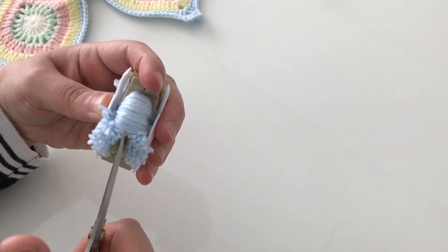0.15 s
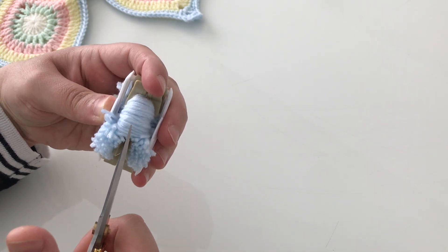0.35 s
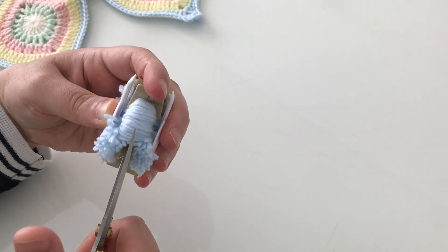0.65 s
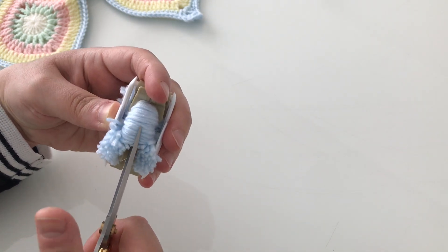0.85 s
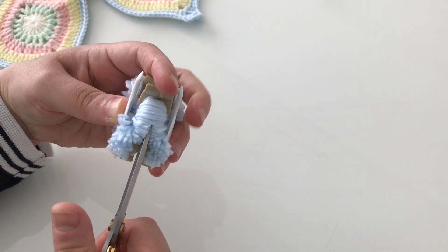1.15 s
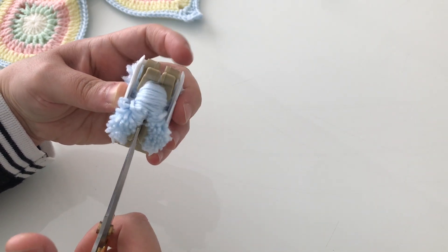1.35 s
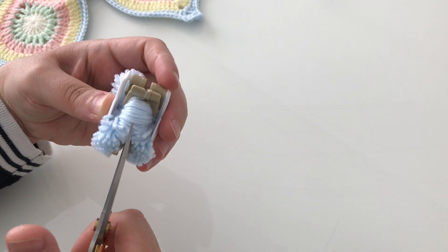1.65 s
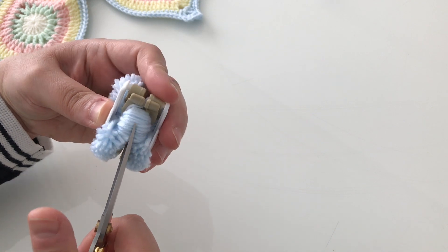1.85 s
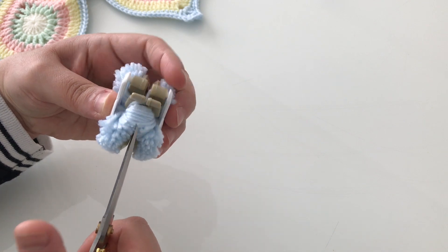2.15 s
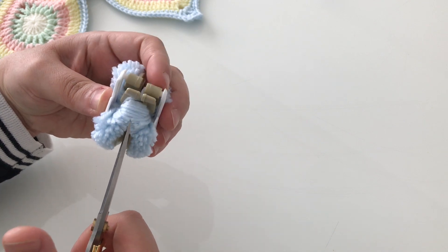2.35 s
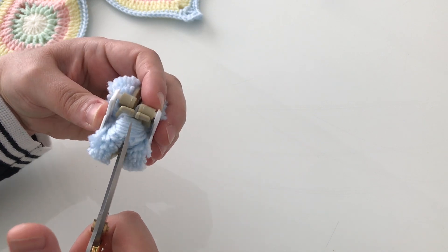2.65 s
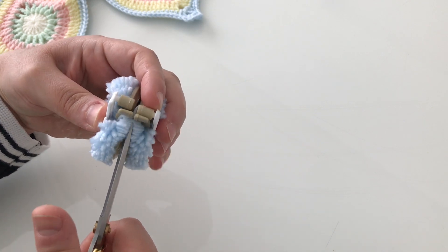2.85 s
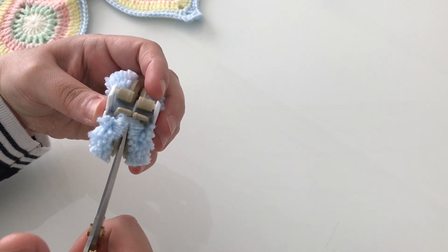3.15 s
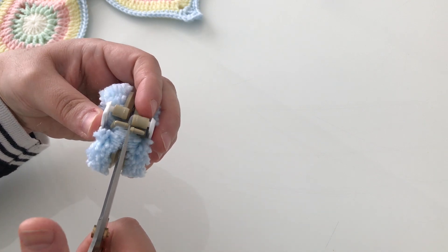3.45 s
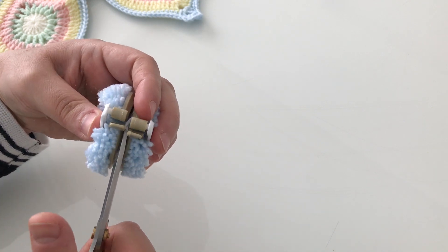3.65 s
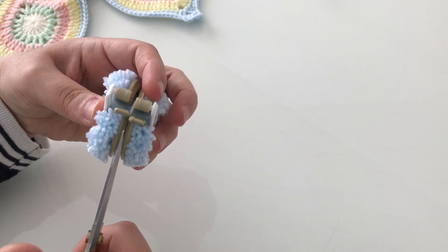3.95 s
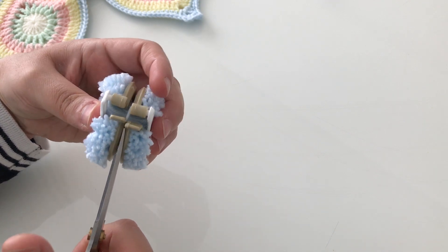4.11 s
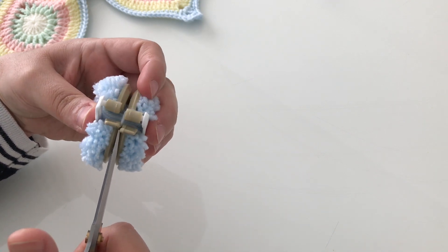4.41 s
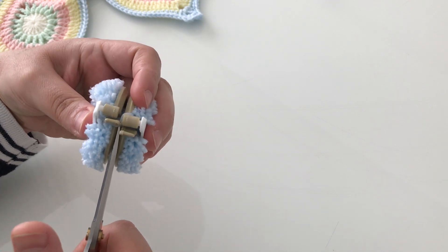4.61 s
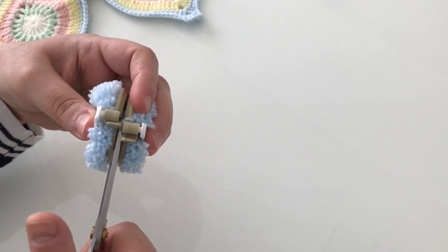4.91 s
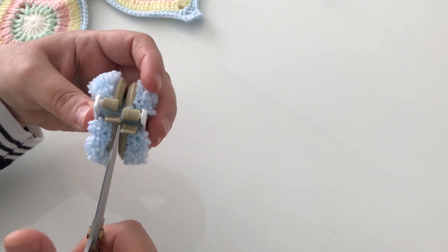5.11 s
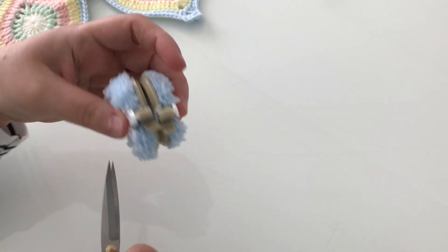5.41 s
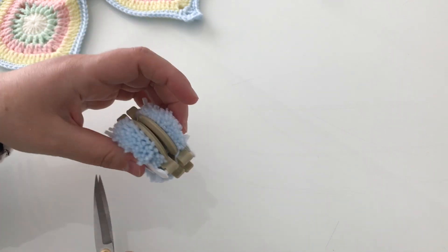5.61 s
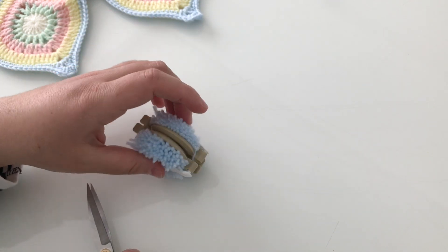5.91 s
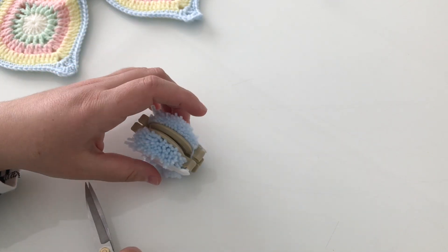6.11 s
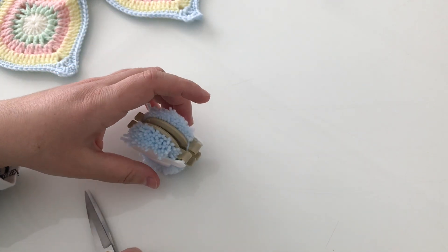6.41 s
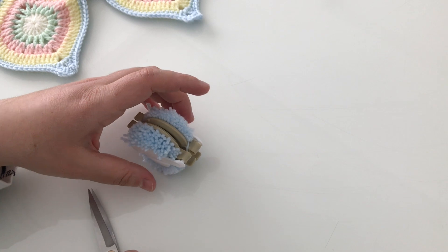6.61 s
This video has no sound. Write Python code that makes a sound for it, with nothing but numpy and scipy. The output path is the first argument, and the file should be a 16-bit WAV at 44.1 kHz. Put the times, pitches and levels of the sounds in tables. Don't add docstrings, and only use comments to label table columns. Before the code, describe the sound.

Scissors crunch softly through yarn with sharp metallic snaps in a quiet room, then are laid down with ticks and a dull, ringing table clatter.

```python
import sys
import numpy as np
from scipy import signal
from scipy.fft import rfft, irfft
from scipy.io import wavfile

SR = 44100
rng = np.random.default_rng(int(sys.argv[2]) if len(sys.argv) > 2 else 0)


def transcribe(u):
    v = np.clip(np.atleast_2d(u).T, -1, 1)
    q = np.round(v * 32767).astype(np.int16)
    wavfile.write(sys.argv[1], SR, q)


def volts(x):
    e = np.asarray(x, float) / 20
    return 10 ** e


N = 298452

# (time [s], peak [dB], below 3 kHz [dB], 3 to 7 kHz [dB], above 13 kHz [dB])
SNAPS = [
    (1.081, -9.5, 2.5, 3, 1.5),
    (1.235, -28, 3, 7, -6),
    (2.04, -4.5, -3, -1, -0.5),
    (2.913, -5.5, 1.5, 4.5, 5),
    (3.674, -2.5, -2.5, 0, 1),
    (4.88, -19, -2, 0, -1),
]
TOUCHDOWN_S = 6.476


def at_hz(points, hz):
    points = np.array(points)
    return np.interp(np.log(np.maximum(hz, 1)), np.log(points[:, 0]), points[:, 1])


def rms_one(x):
    return x / np.sqrt(np.mean(x ** 2) + 1e-20)


def resonate(x, hz, width_hz):
    r = np.exp(-np.pi * width_hz / SR)
    poles = [1, -2 * r * np.cos(2 * np.pi * hz / SR), r * r]
    return signal.lfilter([(1 - r * r) / 2, 0, (r * r - 1) / 2], poles, x)


def ring(x, modes):
    out = 0
    for k, (hz, db, t60) in enumerate(modes):
        r = volts(-60 / (t60 * SR))
        w = 2 * np.pi * hz / SR
        mode = signal.lfilter([0, np.sin(w)], [1, -2 * r * np.cos(w), r * r], x + 1e-18)
        out = out + (-1) ** k * volts(db) * mode
    return out


def grains(count, per_s, spread_db):
    heights_db = spread_db * np.minimum(rng.exponential(1, count), 4)
    sizes = volts(heights_db) * rng.choice([-1, 1], count)
    return rms_one(sizes * (rng.random(count) < per_s / SR))


def add(out, s, sound):
    i = round(s * SR)
    out[i:i + len(sound)] += sound[:N - i]


def cut_top(x, hz):
    return signal.sosfilt(signal.ellip(10, .5, 55, hz, fs=SR, output="sos"), x)


def swell(ms, swell_ms, dying_ms):
    return np.exp(np.where(ms < 0, ms / swell_ms, -ms / dying_ms))


def burst(top_s, rise_ms, dying_ms):
    return swell((np.arange(N) / SR - top_s) * 1000, rise_ms, dying_ms)


def grip():
    return np.max([burst(s, rise_ms=80, dying_ms=170) for s, *_ in SNAPS], axis=0)


def housing_db(hz):
    # (centre [Hz], width [Hz], depth [dB])
    dips = [(5130, 450, -2), (7575, 620, -5.5), (10400, 1500, -10.5), (13200, 1300, -2.5), (15600, 600, -3)]
    return sum(db * np.exp(-((hz - dip_hz) / width) ** 2) for dip_hz, width, db in dips)


def hush():
    # (frequency [Hz], density [dB per Hz])
    noise_density = [(15, -37.5), (25, -10.5), (55, -2.5), (119, -1.5), (194, -5.5), (600, -17.5),
                     (1030, -20.5), (2180, -29.5)]
    hiss_db, rumble_db, rumble_grip_db, boom_db = -64.5, -68, 4.5, -54
    hz = np.arange(N // 2 + 1) * SR / N
    spectrum = rfft(rng.standard_normal(N)) * volts(at_hz(noise_density, hz) + housing_db(hz))
    scale = volts(hiss_db) / np.std(irfft(spectrum, N))
    low_share = 1 / (1 + (hz / 500) ** 2)
    boom = burst(6.65, rise_ms=59, dying_ms=140) * (np.arange(N) > TOUCHDOWN_S * SR)
    drift = volts(rumble_db + rumble_grip_db * grip() - hiss_db) + volts(boom_db - hiss_db) * boom
    rumble = drift * irfft(spectrum * low_share, N)
    hiss = irfft(spectrum * (1 - low_share), N)
    return scale * (rumble + hiss)


def room(x):
    # (frequency [Hz], t60 [s])
    decay_times = [(200, .45), (1000, 0.5), (2500, 0.38), (6000, 0.25), (14000, .17)]
    first_wall_s, wall_rise_s, early_end_s = .0085, .003, .026
    flutter_s, flutter_db, flutter_fade_s = .0155, 3.5, .061
    t = np.arange(SR // 2) / SR
    edges = 100 * 2 ** np.arange(0, 7.6, .5)
    white = rng.standard_normal((2, len(t)))
    tail = 0
    for k, (low, high) in enumerate(zip(edges, edges[1:])):
        band_pass = signal.butter(2, [low, high], "band", fs=SR, output="sos")
        band = signal.sosfilt(band_pass, white[k % 2])
        tail = tail + band * volts(-60 * t / at_hz(decay_times, np.sqrt(low * high)))
    corners_s = [.0014, first_wall_s, first_wall_s + wall_rise_s, early_end_s, early_end_s + wall_rise_s]
    answer = tail * volts(np.interp(t, corners_s, [-3, -14, -2.94, -2.94, -3.5], left=-80))
    answer = answer * volts(flutter_db * np.cos(2 * np.pi * t / flutter_s) * np.exp(-t / flutter_fade_s))
    hz = np.arange(len(t) // 2 + 1) * SR / len(t)
    answer = irfft(rfft(answer) * volts(.9 * housing_db(hz)), len(t))
    return signal.fftconvolve(x, answer)[:N]


def rubbing():
    # (time of the top [s], level [dB], dying time [ms])
    rubs = [(.65, -64.5, 4.9), (.87, -63, 14), (1.469, -71.5, 130), (1.878, -68.5, 63), (2.809, -69, 99),
            (3.108, -67, 18), (3.569, -50, 4.7), (3.85, -70.5, 65), (4.05, -66, 75), (4.918, -61, 8.5),
            (5.17, -64, 9.7), (5.85, -76, 23)]
    rub_hz = 920
    out = np.zeros(N)
    ms = np.arange(-8000, 8000) / SR * 1000
    for (s, db, dying_ms), noise in zip(rubs, rng.standard_normal((len(rubs), len(ms)))):
        rub = resonate(resonate(noise, rub_hz, .8 * rub_hz), rub_hz, .8 * rub_hz)
        add(out, s - 8000 / SR, volts(db) * rms_one(rub) * swell(ms, .58 * dying_ms, dying_ms))
    return out


def rattling_db(t):
    slide_db, rattle_db = -55, -34
    full_s, settle_s = 6.52, 6.636
    landed = np.clip((t - full_s) / 0.0067 + 1, 0, 1)
    sag_db = 70 * np.maximum(t - full_s, 0)
    dying_db = 220 * np.maximum(t - settle_s, 0)
    return slide_db + (rattle_db - slide_db) * landed - sag_db - dying_db


def laying_down():
    # (time [s], peak [dB])
    ticks = [(6.4757, -8), (6.491, -13), (6.522, -25.5), (6.5315, -33), (6.549, -26.5), (6.558, -40),
             (6.575, -30), (6.584, -38), (6.603, -35.5), (6.625, -47), (6.638, -39), (6.763, -59)]
    # (time [s], peak [dB], contact pitch [Hz])
    thuds = [(6.4985, -14.5, 1500), (6.5222, -19, 2500), (6.5232, -17, 1800), (6.5458, -14, 1300),
             (6.551, -18, 2800), (6.554, -45, 2000), (6.575, -18.5, 2080), (6.585, -16.5, 1500),
             (6.605, -28, 1500), (6.612, -31, 1500), (6.64, -23.5, 1800), (6.654, -31, 1500),
             (6.701, -40, 1600)]
    # (frequency [Hz], level [dB], t60 [s])
    steel = [(1300, -14, 0.021), (2500, -33, 0.0041), (3432, -8, 0.021), (3810, 2, 0.006),
             (4960, -8, 0.0081), (5410, -6, 0.0096), (6650, -9, 0.007), (7350, -13, 0.004),
             (8880, -8, 0.007), (10000, -9.5, .003), (11560, -17.5, 0.066), (12660, -15.5, 0.0065),
             (14000, -16.5, 0.0036), (15000, -23, .012)]
    # (frequency [Hz], level [dB], t60 [s])
    table = [(86, -16, 0.17), (108, -15, 0.25), (164.4, -10.5, 0.11), (343, -5, 0.027), (456, -6, 0.055),
             (500, -4, 0.024), (729, -7, 0.033), (853, -11.5, 0.056), (1177, 3, 0.011), (1338, 0.5, 0.032),
             (1800, 7.5, 0.0086), (2050, -1.5, 0.025), (2280, 4, 0.013), (3070, 7, 0.0062)]
    start = round(6.4 * SR)
    count = N - start
    t = np.arange(start, N) / SR
    handles_s = thuds[0][0]
    tips, pushes = np.zeros(N), np.zeros(N)

    scrape = rng.standard_normal((len(ticks), 60)) * np.exp(-np.arange(60) / 14)
    scrape[:, 0] = 3.8
    for (s, db), touch in zip(ticks, scrape):
        softer = 0.72 * (s > handles_s)
        add(tips, s + 0.00074, volts(db - 22.5) * rms_one(signal.lfilter([1], [1, -softer], touch)))
    for s, db, contact_hz in thuds:
        add(pushes, s, -volts(db) * signal.windows.hann(int(SR / contact_hz)))
    tips, pushes = tips[start:], pushes[start:]

    friction_db, sliding = rattling_db(t), t > TOUCHDOWN_S
    rattle = volts(friction_db - 24.5) * grains(count, per_s=1200, spread_db=1.5) * (t > handles_s)
    soft_rattle = signal.lfilter([.3], [1, -.7], rattle)
    grit = signal.lfilter([.4], [1, -.6], grains(count, per_s=16000, spread_db=-7.0))
    grit = volts(friction_db - 13) * grit * sliding
    skid = signal.lfilter([1], [1, -.6], rng.standard_normal(count))
    skid = volts(friction_db - 15) * skid * sliding * swell((t - 6.585) * 1000, 900, 22)
    air_push = signal.lfilter([1, -1], [1, -.93], pushes)

    steel_ring = ring(tips + volts(-30) * rattle + volts(-38) * skid, steel)
    table_ring = ring(volts(-36.5) * pushes + soft_rattle + volts(-26.5) * tips, table)
    out = np.zeros(N)
    out[start:] = steel_ring + grit + skid + volts(-2) * air_push + table_ring
    return out


def yarn():
    # (time of the top [s], peak [dB], dying time [ms], brightness [dB])
    crunches = [(0.8749, -37.5, 2.4, -8.5), (0.911, -44, 3.5, -1), (0.9144, -45, 2.7, -2),
                (0.9238, -31.5, 2.4, 5), (0.9346, -46, 2.5, -9), (0.9767, -57, 2, -18),
                (0.9873, -52, 1.6, 1), (1.2919, -47.5, 5.4, 2), (1.4419, -35.5, 0.65, 4),
                (1.5524, -46.5, 1.6, 4), (1.8156, -48, 1, 8), (1.8716, -40, 1.1, -5.5),
                (1.9016, -35, 2.9, -0.5), (1.9897, -34, 3.5, 2.5), (2.1749, -43.5, 2.5, -4.5),
                (2.794, -42.5, 1.3, 4), (2.8419, -35, 2.3, 2.5), (2.8876, -42, 5, 1), (3.045, -37.5, 2, -9),
                (3.5664, -33, 2, 6.5), (3.5705, -27.5, 0.99, 5), (3.9125, -45, 0.87, 1),
                (4.123, -41, 1.2, 6), (4.1525, -39.5, 0.82, -9), (4.9142, -36, 1.15, -3),
                (5.1742, -35, 1.1, -3)]
    # (time of the top [s], peak [dB], dying time [ms], brightness [dB])
    last_strands = [
        (1.058, -56, 0.72, 19),
        (1.073, -29.5, 2.5, 6),
        (1.079, -68, 2.3, 3),
        (2.04, -30.5, 4.4, 7.5),
        (2.897, -37.5, 5.1, 0.5),
        (2.9094, -34.5, 2.5, 1.5),
        (3.661, -40, 6, 0.5),
        (3.671, -25, 1.7, 3),
    ]
    # (time of the top [s], peak [dB], dying time [ms], brightness [dB])
    rustles = [(.235, -65, 13, 6), (.53, -58.5, 14, 8), (.65, -56.5, 10, 1), (.75, -63.5, 14, 16),
               (.865, -53, 14, -4), (.955, -54.5, 16, -2), (1.662, -57, 14, 3), (1.856, -54, 16, -1.5),
               (1.875, -47, 3.8, -1), (1.918, -49, 11, 1), (2.005, -51.5, 4.3, -3.5),
               (2.221, -61.5, 8.1, 0), (2.301, -61.5, 5.7, -3), (2.605, -62, 14, 21), (2.807, -52, 16, 4),
               (2.83, -50.5, 6, 4), (2.854, -41, 4.7, 1.5), (3.085, -57, 10, 4), (3.315, -59.5, 13, 14.5),
               (3.62, -59.5, 12.3, 5), (3.84, -57, 11.7, -15), (5.172, -58.5, 14.5, -6),
               (3.95, -67, 22, -14)]
    # (time [s], peak [dB], brightness [dB])
    tiny_ticks = [(.908, -36, 14), (0.981, -55, 8), (1.402, -49, -10), (1.407, -47, -15), (1.668, -48, -8),
                  (1.732, -45, 1), (1.786, -52, 10), (1.795, -55, 0), (1.811, -46, 15), (1.83, -53, 8),
                  (1.954, -41, -9), (2.198, -43, 14), (2.24, -44.5, 4), (2.78, -48, -4), (2.807, -50, 6),
                  (3.054, -53.5, -3), (3.097, -49, 0), (3.106, -39, -5), (3.122, -45, 12),
                  (3.132, -39.5, 7), (3.856, -52, 1), (4.138, -49, 15), (5.119, -56.5, 12),
                  (5.165, -42, -12), (5.181, -41, -6)]
    # (frequency [Hz], width [Hz], level [dB])
    open_body = [(1500, 250, -6.5), (2300, 590, 0), (3320, 600, -1), (4280, 560, -2), (6100, 740, -6.5),
                 (7100, 700, -8), (9300, 640, -3), (11360, 730, -3.5), (12500, 1100, -4), (14700, 1200, -8)]
    squeeze_db, squeeze_grip_db = -74, 4.5

    ms = np.arange(-4000, 4000) / SR * 1000
    events = []   # (s, dB, brightness dB, envelope)
    for rows, swell_share in [(crunches, .95), (last_strands, 1), (rustles, 1.1)]:
        for s, db, dying_ms, bright_db in rows:
            events.append((s, db, bright_db, swell(ms, swell_share * dying_ms, dying_ms)))
    for s, db, bright_db in tiny_ticks:
        events.append((s, db, bright_db, swell(ms, .2, .5)))

    chances = rng.standard_normal((len(events), len(open_body)))
    fibres = grains(N, per_s=17000, spread_db=4.5)
    squeeze = volts(squeeze_db + squeeze_grip_db * grip() - 7)
    out = 0
    for k, (hz, width, mode_db) in enumerate(open_body):
        push = squeeze * volts(-4 * (hz > 12000))
        tilt = np.tanh(2.0 * np.log(hz / 5500)) / 2
        for (s, db, bright_db, shape), chance in zip(events, chances[:, k]):
            push_db = db - 15.5 + tilt * bright_db + 3.2 * chance
            add(push, s + .001 - 4000 / SR, volts(push_db) * shape)
        out = out + (-1) ** k * volts(mode_db + 9.5) * resonate(fibres * push, hz, width)
    return out


def snaps():
    # (frequency [Hz], width [Hz], level [dB])
    snap_body = [(870, 550, -20), (2556, 160, -1.5), (3780, 500, -14), (4380, 200, -8.5), (5380, 640, -2.5),
                 (6300, 190, -5), (7000, 600, -16.5), (8730, 430, -5.5), (9660, 280, -1), (11610, 390, -7),
                 (11700, 260, -8.5), (13440, 2700, -5.5), (14300, 700, 4.5), (15300, 350, -20)]
    # (frequency [Hz], width [Hz], level [dB])
    far_body = [(1000, 690, -23.5), (2750, 150, -8.5), (3910, 860, -19.5), (5800, 980, -12.5),
                (9505, 4200, -5), (14300, 5800, -6)]
    chatter_ms = .85
    near, far = np.zeros(N), np.zeros(N)
    t = np.arange(2000) / SR
    thump = resonate(np.exp(-t / .004), 120, 130)
    click = 1. * (t == 0)
    noise = rng.standard_normal((len(SNAPS), 2000))
    for (s, db, low_db, middle_db, top_db), chatter in zip(SNAPS, noise):
        def colour_db(hz):
            if hz < 3000:
                return low_db
            return middle_db if hz < 7000 else top_db * (hz > 13000)

        def sagged(hz):
            return hz * (1 - .035 * (s - 2.8) * (hz < 3000))

        contact = click + volts(-14) * chatter * np.exp(-(t * 1000 / chatter_ms) ** 1.7)
        direct, around = 0, 0
        for k, (hz, width, mode_db) in enumerate(snap_body):
            shaken = clean = resonate(click, sagged(hz), width)
            if hz >= 3000:
                rough = resonate(contact, hz, width)
                shaken = rough * np.std(clean) / np.std(rough)
            direct = direct + (-1) ** k * volts(mode_db + colour_db(hz)) * shaken
        for hz, width, mode_db in far_body:
            around = around + volts(mode_db + 0.49 * colour_db(hz)) * resonate(click, sagged(hz), width)
        hands = volts(db - 44) * thump / thump.max()
        add(near, s + .0013, volts(db) * direct / np.abs(direct).max() + hands)
        add(far, s + .0013, volts(db + 21) * around)
    return near, far


def scene():
    near, far = snaps()
    fibres, laid = yarn(), laying_down()
    walls = room(volts(-43) * (far + volts(1.5) * fibres) + volts(-31) * laid)
    sharp = signal.sosfilt(signal.cheby2(10, 50, 17150, fs=SR, output="sos"), near)
    steady = cut_top(fibres + rubbing() + laid + walls + hush(), 15800)
    return (sharp + steady)[None]


def roll_off(x):
    return signal.sosfilt(signal.butter(12, 17160, fs=SR, output="sos"), x)


def record(dry):
    heard = signal.sosfilt(signal.butter(3, 40, "high", fs=SR, output="sos"), dry)
    return roll_off(heard)


dry = scene()
out = record(dry)
transcribe(out)
```